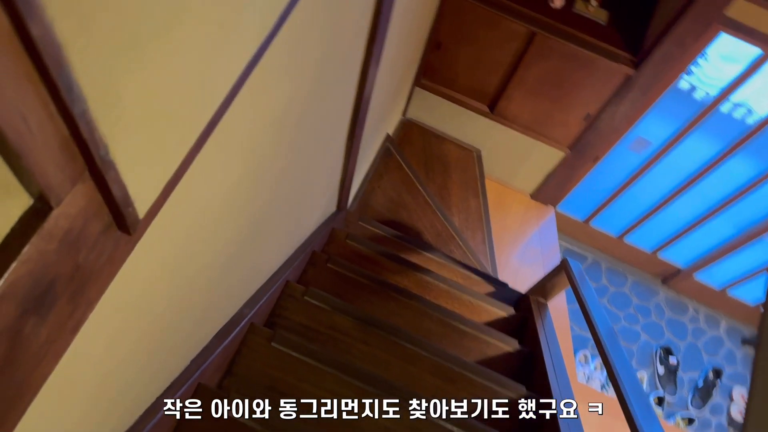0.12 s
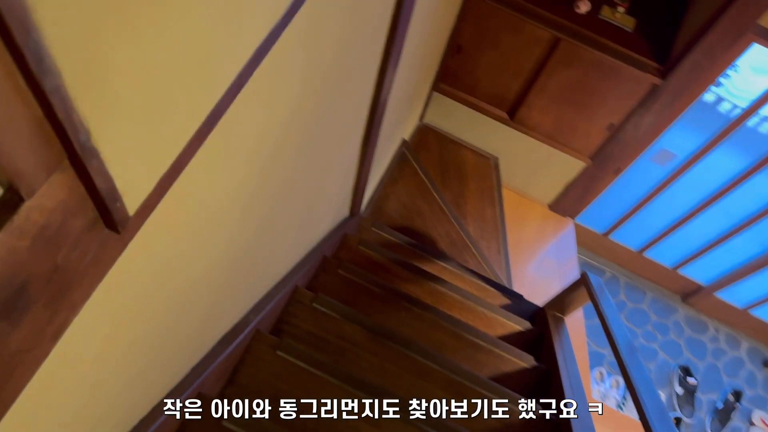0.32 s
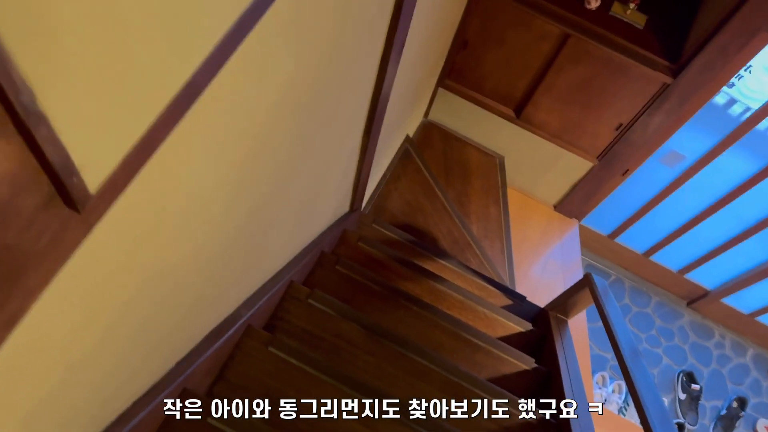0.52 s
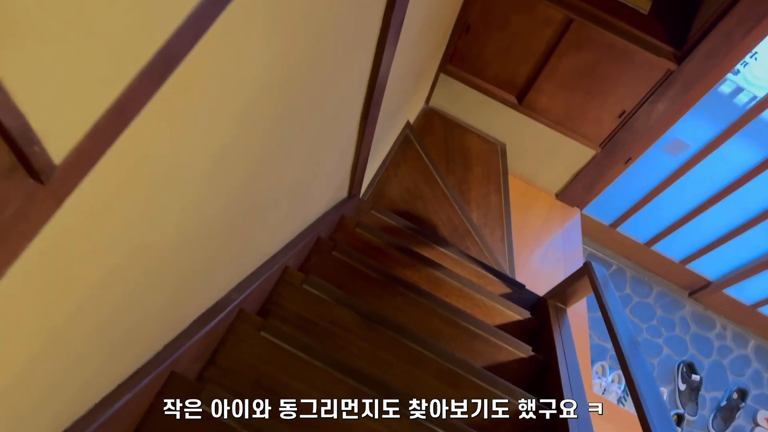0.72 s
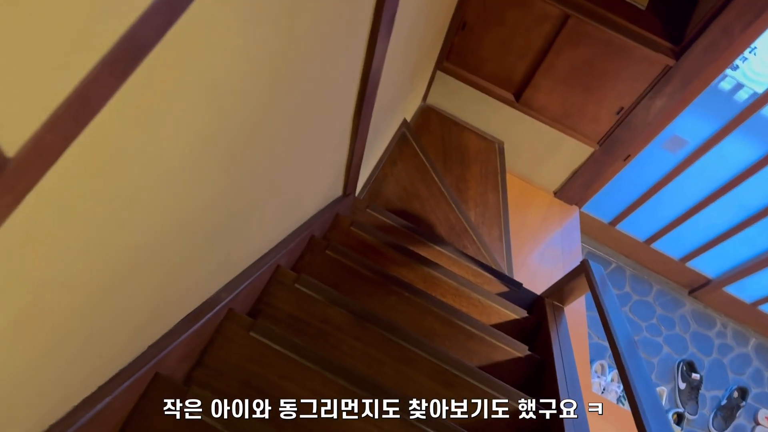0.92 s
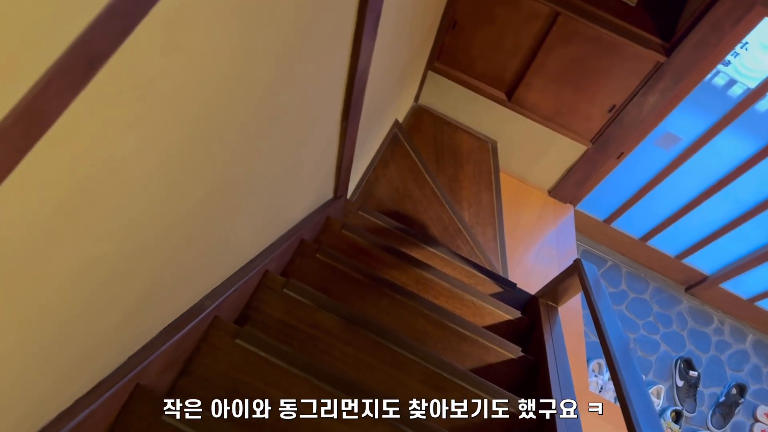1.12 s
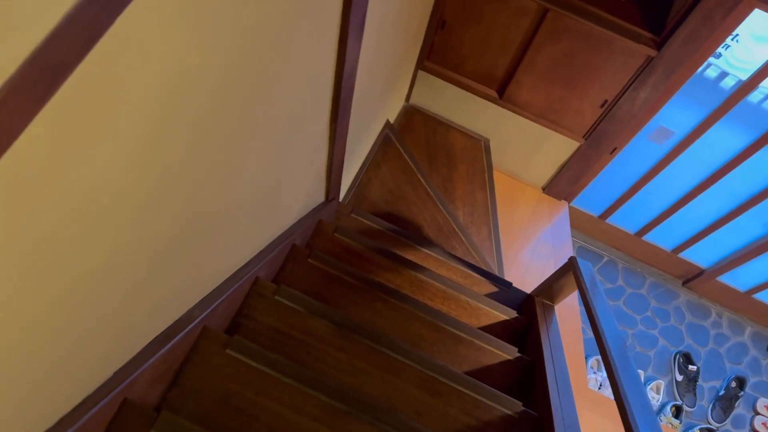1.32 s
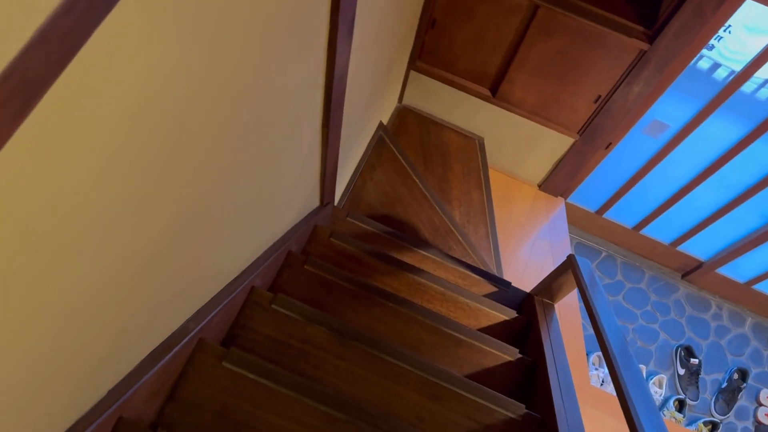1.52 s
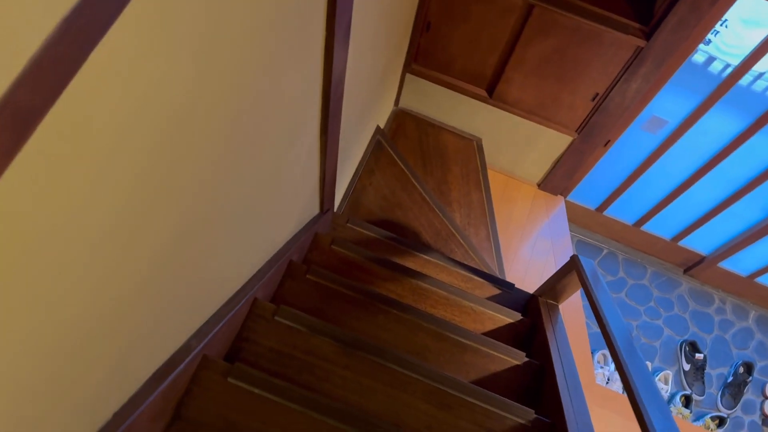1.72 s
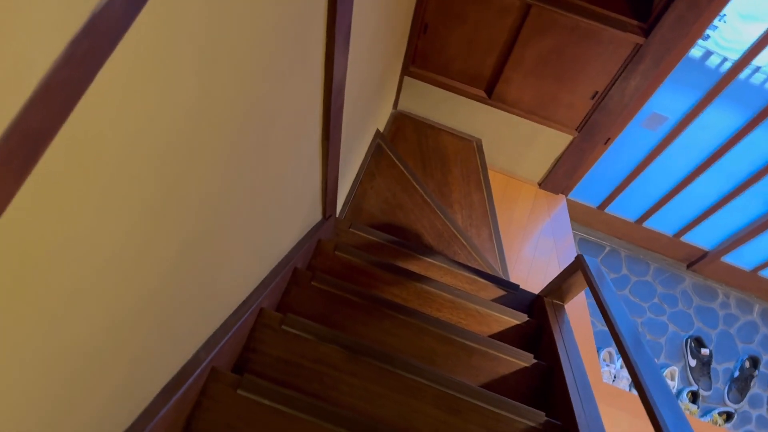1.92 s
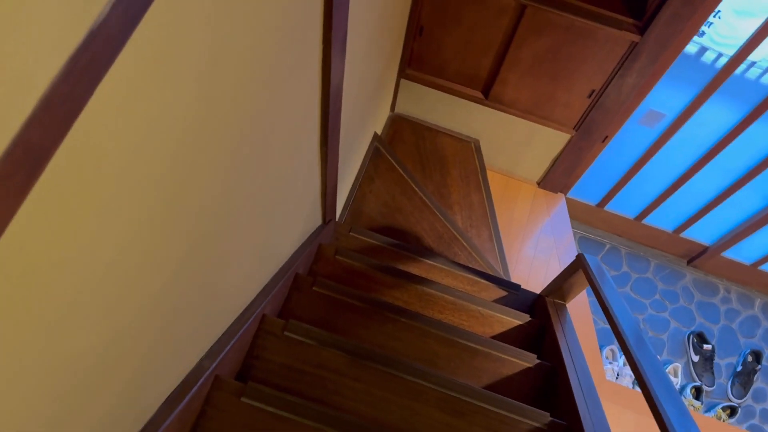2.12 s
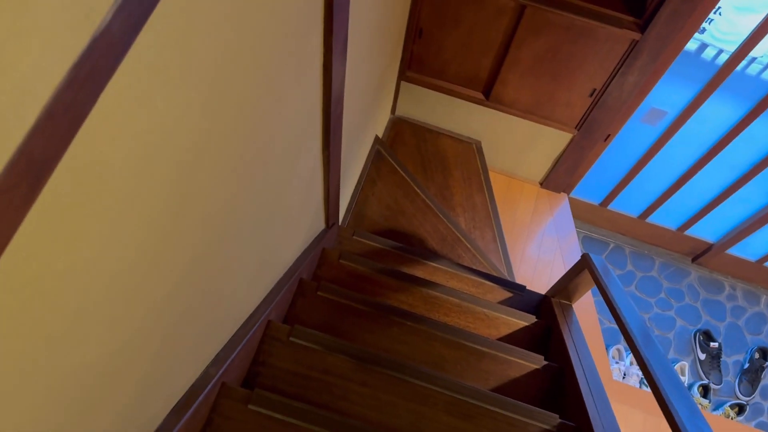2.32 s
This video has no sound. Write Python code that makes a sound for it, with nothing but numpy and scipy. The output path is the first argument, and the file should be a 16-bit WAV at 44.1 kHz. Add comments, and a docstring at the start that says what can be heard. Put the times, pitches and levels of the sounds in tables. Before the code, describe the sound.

Footsteps descend a creaky wooden staircase in a quiet old house, heard closely from the walker's hand. Cloth rustles faintly; small knocks and woody cracks at 0.13-0.24 s lead to the heaviest low thud, sharp snap and sole brush near 0.4 s. Weaker footfalls come at 0.6 s, a cluster of cracks at 1.0-1.15, a strong crack at 1.6, then light touches and scuffs around 1.9-2.05, fading to near silence.

```python
"""Someone walks slowly down a steep wooden staircase in an old house, heard from the walker's own hand.
Clothes rustle from the start over the quiet house, both as coloured noise; faint footfalls and cracks follow.
Near 0.4 s the heaviest footfall excites the modes of the flight, beside a sharp crack of a slipping joint
and the brush of a sole. More footfalls and cracks come near 0.6, 1.0-1.15 and 1.6 s; each crack is a short
noise snap with a pitched ring and a stairwell tail. Light touches, brushes and weaker cracks end the scene."""
import sys
import numpy as np
from scipy import signal
from scipy.fft import rfft, irfft
from scipy.io import wavfile
from scipy.ndimage import uniform_filter1d

SR = 44100
rng = np.random.default_rng(int(sys.argv[2]) if len(sys.argv) > 2 else 0)


def dump_mix(stems):
    """Bounce the given channels to the path in sys.argv[1] as a 16-bit WAV at rate SR."""
    frames = np.atleast_2d(stems).T  # one column per channel
    limited = np.clip(frames, -1, 1)  # hard clip at full scale
    pcm = np.round(limited * 32767).astype(np.int16)
    wavfile.write(sys.argv[1], SR, pcm)


N = 105840
T = np.arange(N) / SR
HZ = np.maximum(np.fft.rfftfreq(N, 1 / SR), 1)

# modes of the staircase: f/Hz, relative level/dB, t60/s
STAIR_MODES = [(59, 3.5, .14), (94.1, -6.5, .28), (146.7, -3.5, 0.37), (162.2, -2.5, 0.3),
               (268.7, -5, 0.29), (336.2, -10.5, 0.34), (411, 2, 0.18), (458.7, -4, 0.35), (595, -12, 0.24),
               (696, -27, .19), (883, 9, 0.086), (1125, -7, 0.22), (1205, -5.5, .18), (1618, -17, 0.33),
               (1856, -8.5, 0.17), (2220, -27.5, 0.1), (2698, -6, 0.2)]
BOOM_HZ, THUMP_HZ, KNOCK_HZ = 54.6, 154, 364  # of the flight, the tread and the board
BOOM_SWELL_S = 0.021  # extra rise time of a mode at BOOM_HZ
WIDE_FROM_HZ, WIDE_TO_HZ = 530, 5250  # the middle range, where the two sides differ most


def undb(db):
    """Amplitude ratio of a level: 20 dB are a factor of ten."""
    return 10 ** (np.asarray(db) / 20)


def slope(hz, points):
    """Spectral envelope: gain at hz, with levels joined linearly over log frequency."""
    f, db = np.array(points, float).T
    return undb(np.interp(np.log(hz), np.log(f), db))


def wide(hz):
    """Band weighting: near 1 in the middle range, falling to 0 outside."""
    return 1 / (1 + (WIDE_FROM_HZ / hz) ** 5) / (1 + (hz / WIDE_TO_HZ) ** 20)


def noise(gain, spread=1):
    """Interaural coherence: stereo noise of rms 1, coherent in the bass and less so above."""
    mid_width, treble_width = 1, 0.28  # side over mid
    mid, side = rfft(rng.standard_normal((2, N)))
    width = spread * (mid_width * wide(HZ) + treble_width * (HZ > WIDE_TO_HZ))
    signs = np.array([[1], [-1]])
    spectrum = gain * (mid + width * side * signs) / np.sqrt(1 + width ** 2)
    x = irfft(spectrum, N)
    return x / x.std()


def band(centres, index):
    """Power-complementary filter bank: one of several overlapping bands; the outer ones stay open."""
    power = np.interp(np.log(HZ), np.log(centres), np.eye(len(centres))[index])
    return np.sqrt(power)


def fade(t, t60):
    """Exponential damping: the level falls by 60 dB in t60."""
    return np.exp(-np.log(1000) * t / t60)


def swell(t, rise):
    """Inertia of a driven body: a smooth rise from 0 to 1 on the time scale rise."""
    return 1 - np.exp(-(t / rise) ** 2)


def after(start):
    """Causality: samples of at most one second from a blow onwards, and the time since it."""
    i = max(int(start * SR), 0)
    return slice(i, min(i + SR, N)), T[:min(SR, N - i)]


def ring(t, colour, rise):
    """Modal superposition: a blow excites damped modes by its spectrum; low modes build up slowly."""
    out = 0
    draws = rng.uniform(-1.02, 1, (len(STAIR_MODES), 2))
    for (hz, db, t60), (detune, phase) in zip(STAIR_MODES, draws):
        envelope = swell(t, rise + BOOM_SWELL_S * (BOOM_HZ / hz) ** 2) * fade(t, t60)
        pitch = hz * (1 + 0.0087 * detune)
        start_phase = np.pi * phase * (hz > 2 * BOOM_HZ)  # the lowest modes start at zero
        wave = np.sin(2 * np.pi * pitch * t + start_phase)
        out = out + undb(db) * slope(hz, colour) * envelope * wave
    return np.sqrt(2) * out


def grain():
    """Irregular transmission: small resonances of the boards roughen the gain over frequency."""
    grain_db, grain_width_hz = 3, 87
    knots = np.arange(0, SR / 2, grain_width_hz)
    return undb(grain_db * np.interp(HZ, knots, rng.standard_normal(len(knots))))


def flicker():
    """Random amplitude modulation: rubbing has a quick, slightly uneven gain."""
    depth_db = 0.5  # rms
    x = rng.standard_normal(N)
    for _ in range(2):
        x = uniform_filter1d(x, size=260)
    return undb(depth_db * x / x.std())


def house_quiet():
    """Stationary noise: the quiet of the house has a steady level and a fixed spectrum."""
    # colour of the quiet: f/Hz, relative level/dB
    quiet_colour = [(20, -11), (55, 5), (150, -9), (300, -23.5), (1000, -30.5), (4500, -38.5),
                    (9000, -29.5), (10500, -25), (12000, -50.5), (16000, -45)]
    level_db = -70.5
    return undb(level_db) * noise(slope(HZ, quiet_colour))


def clothes():
    """Friction noise: cloth rubs as broadband noise with a changing level."""
    # level of the rustle: t/s, level/dB
    rustle = [(0, -72), (.15, -66), (.5, -68.5), (.68, -68), (.78, -74.5), (.97, -70.5), (1.25, -73),
              (1.38, -71), (1.5, -76), (1.75, -73.5), (1.8, -68.5), (1.87, -74.5), (1.95, -68.5),
              (2.06, -70.5), (2.14, -90), (2.4, -79.5)]
    # colour of the rustle: f/Hz, relative level/dB
    rustle_colour = [(100, -4.5), (400, 1), (1000, -1.5), (2500, -1), (5000, -8), (8000, -5), (10300, -1.5),
                     (11800, -27.5), (16000, -30.5)]
    level = undb(np.interp(T, *np.array(rustle).T))
    return level * flicker() * noise(slope(HZ, rustle_colour))


def soles():
    """Friction noise: soles brush the treads in short bell-shaped swells."""
    # brushes: t/s, half length to 1/e in amplitude/s, level/dB
    brushes = [(0.379, 0.017, -50), (0.995, 0.017, -61), (1.143, 0.055, -60), (1.585, 0.014, -60.5),
               (1.89, 0.018, -64), (1.968, 0.025, -60), (2.008, 0.02, -54.5), (2.033, .025, -68.5)]
    # colour of the brushes: f/Hz, relative level/dB
    brush_colour = [(100, -13), (420, 13), (900, -7), (1500, -3), (4000, -11), (8000, -8), (10500, -3),
                    (12000, -34.5), (16000, -28)]
    level = sum(undb(db) * np.exp(-((T - at) / half) ** 2) for at, half, db in brushes)
    return level * flicker() * noise(slope(HZ, brush_colour))


def touches():
    """Impact excitation: light touches of a toe on a board ring the staircase's modes."""
    # touches: t/s, level/dB
    toe_touches = [(1.529, -57.5), (1.950, -58.5), (2.045, -58)]
    # colour of a touch: f/Hz, relative level/dB
    touch_colour = [(60, -13.5), (160, 0), (280, -19.5), (420, -4.5), (650, -16.5), (920, -9.5),
                    (2000, -17.5)]
    out = np.zeros((2, N))
    for start, db in toe_touches:
        span, t = after(start)
        out[:, span] += undb(db) * ring(t, touch_colour, .002)
    return out


def cracks():
    """Stick-slip release: a joint snaps, its boards ring and the stairwell reverberates."""
    # slips: t/s, relative level/dB in each of the seven bands, the joint's own pitch f/Hz, its ring level/dB
    slips = [(0.1275, -51, -54.5, -60, -49, -43, -39, -47, 463, -49),
             (0.2062, -52, -35, -34.5, -33, -37.5, -47, -47, 1560, -35),
             (0.2287, -39.5, -36, -32.5, -47, -32, -37.5, -52, 1176, -28),
             (0.2330, -35, -53, -80, -72, -43, -39, -50, 2920, -35),
             (0.3790, -50.5, -37.5, -43, -38.5, -28, -31.5, -36.5, 1234, -37.5),
             (0.39, -42, -56, -62, -74, -69, -62, -61, 513, -40),
             (0.5967, -46, -52.5, -54, -53.5, -47.5, -45.5, -82, 588, -54),
             (0.647, -56.5, -70, -62, -58, -73, -61, -87, 413, -50),
             (1.0013, -47, -43.5, -50, -45, -36.5, -37.5, -46, 1510, -59),
             (1.0519, -51.5, -51.5, -52, -61, -51, -32, -37, 1235, -35.5),
             (1.0534, -34.5, -35.5, -50, -45, -44, -58.5, -70, 860, -52),
             (1.1043, -84, -51, -50, -51, -53, -50, -75, 2710, -50),
             (1.5925, -35, -31.5, -34, -36.5, -29, -29.5, -39, 407, -31),
             (1.885, -61.5, -86, -64, -71, -57.5, -52, -74, 470, -67),
             (1.963, -81, -78, -56.5, -65, -60, -64, -85, 1395, -55),
             (2.0071, -47.5, -49.5, -51.5, -47, -62, -46.5, -46, 460, -52),
             (2.372, -100, -63.5, -70.5, -76, -59, -60.5, -97.5, 880, -65.5)]
    # bands: f/Hz, decay time of the snap to 1/e/s, relative level of the stairwell tail/dB, its t60/s
    crack_bands = [(400, 0.0088, -7.5, 0.28), (1010, 0.0062, -10.5, 0.29), (1944, 0.0094, -15.5, .32),
                   (4150, 0.0022, -15.5, 0.24), (6650, 0.0015, -21, 0.17), (9600, 0.0024, -25.5, 0.26),
                   (13770, 0.0035, -13, .15)]
    rise_share = 0.37  # rise of a snap as a share of its decay time
    top_hz, sizzle_db = 10770, -30.5  # the treble above top_hz keeps a faint remainder
    joint_t60_s, overtone, overtone_db = 0.095, 1.6, -21  # overtone as a frequency ratio
    ring_db, ring_rise_s = -11, 0.0014
    out = np.zeros((2, N))
    centres = [row[0] for row in crack_bands]
    limits = (1 / (1 + (HZ / top_hz) ** 40) + undb(sizzle_db)) / (1 + (270 / HZ) ** 4)
    for k, (_, snap_s, tail_db, t60) in enumerate(crack_bands):
        gain = band(centres, k) * limits * grain()
        snap, tail = noise(gain, spread=0.79), noise(gain)
        for start, *levels, _, _ in slips:
            span, t = after(start)
            direct = (1 - np.exp(-t / (rise_share * snap_s))) * np.exp(-t / snap_s)
            echo = undb(tail_db) * (1 - np.exp(-t / 0.0005)) * fade(t, t60)
            out[:, span] += undb(levels[k]) * (direct * snap[:, span] + echo * tail[:, span])
    for start, *levels, joint_hz, joint_db in slips:
        span, t = after(start)
        turn = 2 * np.pi * joint_hz * t
        tone = np.sin(turn) + undb(overtone_db) * np.sin(overtone * turn)
        out[:, span] += undb(joint_db) * fade(t, joint_t60_s) * tone
        # little of a crack's energy goes into the low modes
        colour = [(THUMP_HZ, levels[0] - 26.5)] + list(zip(centres, levels))
        out[:, span] += undb(ring_db) * ring(t, colour, ring_rise_s)
    return out


def footfalls():
    """Forced vibration: a soft sole pushes the low modes; the flight sways and the house frame rumbles on."""
    # footfalls and shifts of weight: t/s, relative level/dB of the flight's boom, of the tread's thump
    # and of the board's knock, rise time of the contact/s
    blows = [(0.0, -64.5, -66, -89, 0.0019), (0.072, -67, -76, -84.5, 0.011),
             (0.131, -69, -45.5, -46, 0.0066), (0.211, -46, -40.5, -37, 0.002),
             (0.239, -40, -23.5, -33.5, 0.0033), (0.411, -27, -49.5, -61, .008),
             (0.379, -21, -30, -41.5, .007), (0.601, -55, -39.5, -62.5, 0.0067),
             (0.664, -47.5, -44.5, -58.5, 0.004), (0.736, -52, -86, -76, 0.0043),
             (0.793, -55, -74, -83, 0.0053), (0.868, -60.5, -57.5, -75, 0.0042),
             (1.005, -50.5, -37.5, -49, 0.002), (1.058, -47, -36.5, -45, 0.0034),
             (1.100, -44, -44, -41.5, 0.0084), (1.150, -54, -51.5, -55.5, 0.0068),
             (1.540, -45, -39.5, -55, 0.018), (1.596, -62.5, -65.5, -38.5, 0.0042),
             (1.632, -63, -43.5, -57.5, 0.012), (1.795, -53, -60.5, -78.5, 0.0068),
             (1.91, -52, -59.5, -67.5, 0.0052), (2.013, -50.5, -44, -61, 0.0039),
             (2.042, -69.5, -61.5, -67, 0.0039), (2.227, -56.5, -83.5, -87, 0.0077)]
    ring_db, flight_db = -3.5, 10.5  # all modes; extra in the lowest ones
    knock_fall_db = -22.5  # a soft sole hardly reaches two octaves over the knock
    sway_hz, sway_db, sway_t60_s = STAIR_MODES[0][0], -10, 0.51  # level relative to the boom
    noise_db, frame_db, thud_t60_s = -3, -7, 0.12  # all noise; the boom's share in the frame
    house_db, house_t60_s = -21, 0.52  # the slower part of the decay
    out = np.zeros((2, N))
    limits = 1 / (1 + (46 / HZ) ** 8) / (1 + (HZ / 560) ** 4)
    frame = [noise(band([BOOM_HZ, THUMP_HZ, KNOCK_HZ], k) * limits) for k in range(3)]
    for start, boom, thump, knock, contact in blows:
        span, t = after(start)
        colour = [(BOOM_HZ, boom + flight_db), (THUMP_HZ, thump),
                  (KNOCK_HZ, knock), (4 * KNOCK_HZ, knock + knock_fall_db)]
        out[:, span] += undb(ring_db) * ring(t, colour, contact)
        sway = swell(t, 2 * BOOM_SWELL_S) * fade(t, sway_t60_s) * np.sin(2 * np.pi * sway_hz * t)
        out[:, span] += undb(boom + sway_db) * sway
        envelope = swell(t, contact) * (fade(t, thud_t60_s) + undb(house_db) * fade(t, house_t60_s))
        levels = (boom + frame_db, thump, knock)
        rumble = sum(undb(db) * x[:, span] for db, x in zip(levels, frame))
        out[:, span] += undb(noise_db) * envelope * rumble
    return out


def scene():
    """Linear superposition: steps, cracks and rustle add to the quiet of the house."""
    return house_quiet() + clothes() + soles() + touches() + cracks() + footfalls()


def record(dry):
    """Phase and level differences of a close microphone pair: the left gets the mids later and weaker."""
    mid_lag_s, treble_lag_s, lag_from_hz = 0.00052, .00008, 110
    mid_pan_db = -1.3  # left over right
    low_cut_hz, top_hz = 24, 16000
    hz = np.maximum(np.fft.rfftfreq(2 * N, 1 / SR), 1)
    left, right = rfft(dry, 2 * N)
    mid_cycles = hz * mid_lag_s / (1 + (lag_from_hz / hz) ** 4)
    treble_cycles = (hz - WIDE_TO_HZ) * treble_lag_s
    angle = 2 * np.pi * np.where(hz < WIDE_TO_HZ, mid_cycles, treble_cycles)
    # averaging over neighbouring frequencies softens the phase turn
    turn = uniform_filter1d(np.cos(angle), size=600) - 1j * uniform_filter1d(np.sin(angle), size=600)
    pan = undb(wide(hz) * mid_pan_db / 2)
    pair = irfft(np.array([left * pan * turn, right / pan]), 2 * N)[:, :N]
    pair = signal.sosfilt(signal.butter(2, low_cut_hz, "high", fs=SR, output="sos"), pair)
    return signal.sosfilt(signal.ellip(8, .2, 70, top_hz, fs=SR, output="sos"), pair)


dry = scene()
out = record(dry)
dump_mix(out)
```